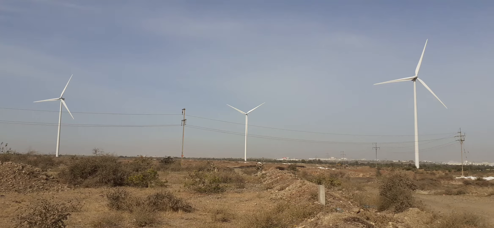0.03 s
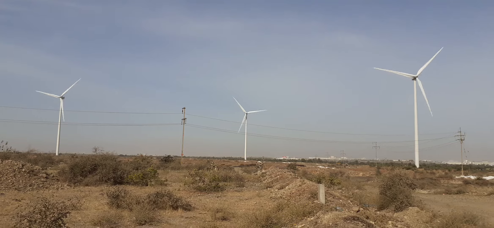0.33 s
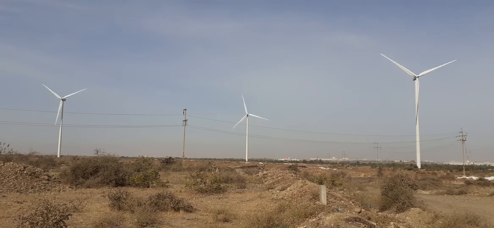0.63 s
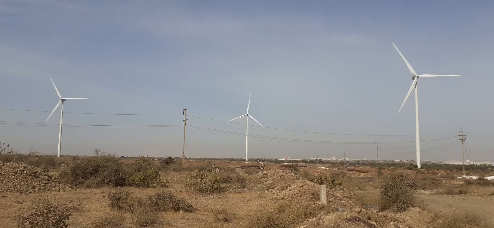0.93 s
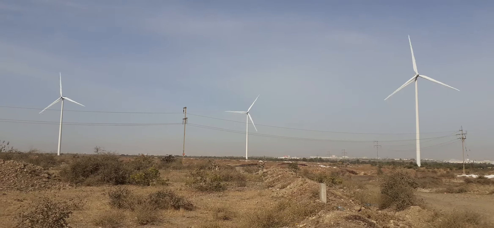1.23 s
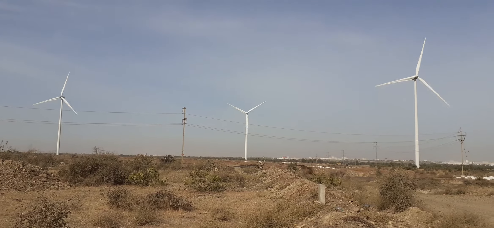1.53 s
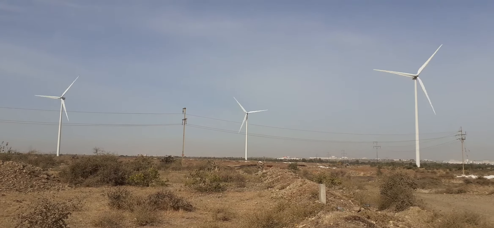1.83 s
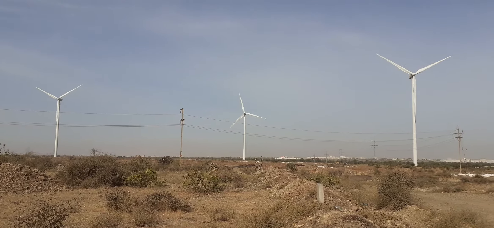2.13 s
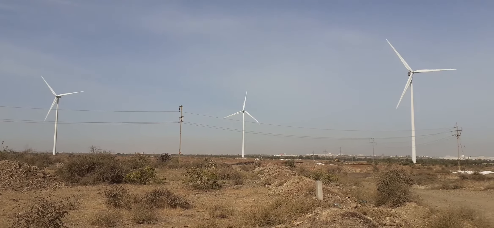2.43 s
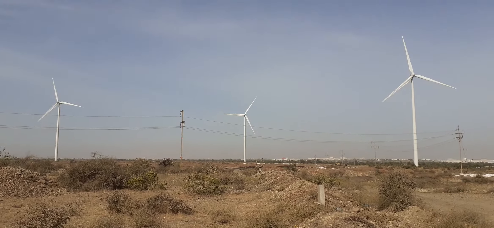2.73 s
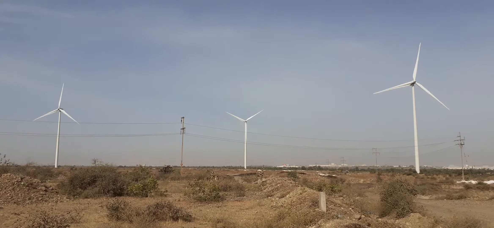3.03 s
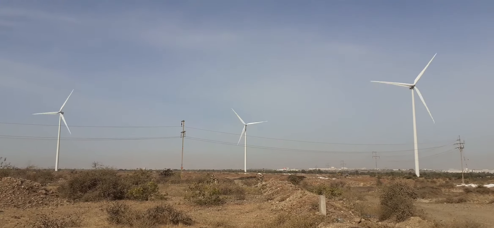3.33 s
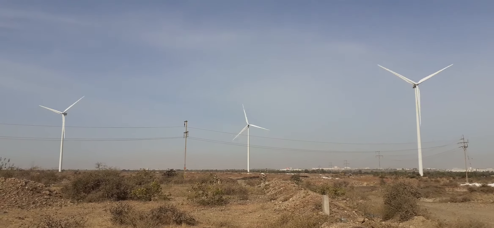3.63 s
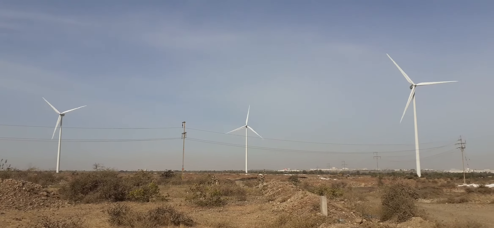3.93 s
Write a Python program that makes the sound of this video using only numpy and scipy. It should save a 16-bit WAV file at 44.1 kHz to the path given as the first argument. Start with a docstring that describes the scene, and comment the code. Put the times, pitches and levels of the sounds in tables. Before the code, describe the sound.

Wind turbines turn on an open plain, making a steady low rumble with a wavering hum and soft blade swishes. After a second or so, gusts start bumping the microphone on the left, and a faint whistle falls near the end.

```python
"""An open dry plain, where wind turbines turn. A distant rumble carries the wavering tones of their gears
and generators. Air flowing over the blades radiates a broad swish, tip hiss, brief whooshes and one thin
whistle that sinks in pitch as its blade turns away. Gusts buffet the left microphone port in short
low bumps, and turbulence flutters on both ports, faintly on the right one."""
import sys
import numpy as np
from scipy import signal
from scipy.fft import rfft, irfft
from scipy.io import wavfile

SR = 44100
rng = np.random.default_rng(int(sys.argv[2]) if len(sys.argv) > 2 else 0)


def wav_record(signal):
    """Record a signal, one row per channel, as 16-bit PCM in the file named by sys.argv[1]."""
    frames = np.transpose(np.atleast_2d(signal))
    bounded = np.clip(frames, -1, 1)
    # unit amplitude maps onto the largest positive 16-bit level
    quanta = np.round(bounded * 32767).astype(np.int16)
    wavfile.write(sys.argv[1], SR, quanta)


N = 176400
TIME = np.arange(N) / SR
PORT_EDGE_HZ = 43.8   # lower limit of the microphone ports


def rumble():
    """Air absorbs treble over distance, so far turbines and traffic merge into a low roar."""
    # (frequency [Hz], relative spectral density [dB])
    spectrum = [(25, -23), (40, -22.5), (55, 1.5), (120, 6), (160, 2), (320, 6), (420, -1), (560, -2),
                (800, -9.5), (930, -22.5), (1400, -24.5), (2200, -40.5), (4000, -58)]
    # (time [s], left level [dB], right level [dB])
    levels = [(0, -34, -36), (.9, -38, -39.5), (1.35, -36, -37.5), (2.2, -40, -40.5), (3.1, -38.5, -40),
              (3.7, -39, -41.5), (4, -35, -39)]
    bass_hz, fill_s = 150, 0.34
    roar = butter(banded_noise(spectrum, flicker_db=0.97), PORT_EDGE_HZ, "high", order=4)
    bass = butter(roar, bass_hz, "low", order=2)
    bass = butter(bass[:, ::-1], bass_hz, "low", order=2)[:, ::-1]   # backward pass: zero phase
    thinning = .5 * np.clip(2 - 2 * TIME / fill_s, 0, 1)   # the bass fills in at the start
    return from_db(in_time(levels)) * (roar - thinning * bass)


def gears():
    """Periodic forces in gearboxes and generators radiate tones; amplitude modulation makes them waver."""
    # (frequency [Hz], level [dB], line width [Hz], left minus right [dB])
    tones = [(194.3, -44, 5.9, 1), (221.4, -53, 5.8, -1), (485.3, -50.5, 2.7, 1), (777, -53.5, 24, 0.5),
             (818, -57.5, 20, -2), (969, -62, 3.9, 4.5), (1112, -62.5, 44, -9.5), (1960, -67, 55, 11.5),
             (4885, -83, 8, -14.5)]
    # swell of the main gear tone: (time [s], gain [dB])
    swell = [(0, 7.5), (.6, -8), (1.4, 11), (1.7, 1.5), (2.5, -0.5), (3.1, 4.5), (4, 4)]
    main_hz, swell_db = 486, in_time(swell)[0]
    out = 0
    for hz, db, width_hz, pan_db in tones:
        is_main = abs(np.log2(hz / main_hz)) < .5
        waver_db = -0.7 * np.array([drift(4.1), drift(8.5)])
        out += pan(pan_db) * from_db(db + is_main * swell_db + waver_db) * narrow_tone(hz, width_hz)
    return out


def blade_swish():
    """Turbulent flow over the blades radiates broadband noise that swells and fades."""
    # (time [s], relative level [dB])
    levels = [(.15, -54.5), (.72, -59.5), (1.38, -54.5), (1.8, -57.5), (2.4, -60), (3.15, -55.5),
              (3.3, -57), (3.78, -55.5), (3.98, -62)]
    # (frequency [Hz], relative spectral density [dB])
    spectrum = [(500, -7.5), (1000, 5.5), (1500, 3.5), (2100, -1.5), (2900, -3.5), (3600, -18.5),
                (4400, -16.5), (7500, -41)]
    return pan(-2) * from_db(in_time(levels) + 6.5) * banded_noise(spectrum, flicker_db=1.0)


def tip_hiss():
    """Flow noise rises in frequency with speed: the nearest blade tips hiss, on the right."""
    # (time [s], relative level [dB])
    levels = [(.13, -63), (.35, -64.5), (.72, -68), (1.15, -65), (1.45, -61), (1.85, -64), (2.45, -68.5),
              (2.8, -65), (3.0, -69), (3.15, -62.5), (3.27, -67), (3.6, -66.5), (3.97, -70.5)]
    # (frequency [Hz], relative spectral density [dB])
    spectrum = [(2000, -10.5), (3200, 2.5), (4100, -5.5), (5000, 0), (6300, -4), (7500, -17), (9000, 0)]
    return pan(-12) * from_db(in_time(levels) + 2) * banded_noise(spectrum, flicker_db=1.8)


def blade_whistle():
    """Doppler shift: a narrow-band whistle sinks in pitch as its blade turns away."""
    # (time [s], frequency [Hz], level [dB])
    glide = [(2.52, 6740, -90.5), (2.8, 6770, -73), (2.97, 6510, -78), (3.06, 6510, -63.5),
             (3.29, 6030, -74), (3.33, 5980, -63), (3.38, 5800, -72), (3.5, 5560, -70), (3.69, 5250, -70.5),
             (3.82, 5050, -88)]
    hz, db = in_time(glide)
    envelope = from_db(db + 1.8 * drift(14)) * (TIME > glide[0][0])
    return pan(-11) * envelope * narrow_tone(hz, width_hz=110)


def whooshes():
    """Air rushing past makes band-limited noise, in Gaussian swells that rise twice as fast as they fade."""
    # (peak time [s], fade [s], frequency [Hz], level [dB], left minus right [dB], half width [ratio])
    swells = [(1.135, 0.093, 2900, -56.5, -7, 0.15), (1.17, 0.064, 6300, -65, -13, 0.13),
              (1.307, 0.044, 6050, -62.5, -10, 0.052), (2.891, 0.14, 3330, -60, -2, 0.11),
              (3.122, 0.086, 3400, -54.5, -3.5, 0.18)]
    out = 0
    for peak_s, fade_s, hz, db, pan_db, half_width in swells:
        band_hz = [hz * (1 - half_width), hz * (1 + half_width)]
        air = rms_one(butter(rng.standard_normal((2, N)), band_hz, "band", order=2))
        span_s = fade_s * np.where(TIME < peak_s, .5, 1)
        envelope = np.exp(-np.pi / 2 * ((TIME - peak_s) / span_s) ** 2)
        out += pan(pan_db) * from_db(db) * envelope * air
    return out


def buffets():
    """Pseudo-sound: each eddy striking the left port is a pressure jolt in a short swell of turbulence."""
    # (time [s], duration [s], level [dB], brightness [Hz])
    eddies = [(1.356, 0.0066, -23.5, 332), (1.379, 0.01, -20, 330), (1.418, 0.017, -27.5, 218),
              (1.43, 0.0062, -24, 280), (1.457, 0.01, -19.5, 238), (1.691, 0.0056, -19, 800),
              (1.7, 0.005, -9, 860), (1.706, 0.0097, -13, 124), (1.957, 0.0073, -15.5, 270),
              (2.071, 0.0031, -17.5, 720), (2.103, 0.016, -20.5, 420), (2.138, 0.0086, -16, 330),
              (2.187, 0.0064, -20, 440), (2.203, 0.0041, -20.5, 700), (2.236, 0.0069, -20, 540),
              (2.248, 0.0033, -18, 680), (2.274, 0.0097, -25, 442), (2.312, 0.019, -21, 430),
              (2.322, 0.0074, -23, 650), (2.336, 0.0016, -14, 900), (2.43, 0.0086, -24, 600),
              (2.435, 0.015, -17.5, 130), (2.535, 0.008, -17, 260), (2.554, 0.0075, -21, 299),
              (2.614, 0.013, -22, 150), (2.751, 0.0063, -22, 247), (2.772, 0.011, -25.5, 298),
              (3.131, 0.008, -18, 382), (3.155, 0.015, -14, 302), (3.176, 0.0051, -14.5, 260),
              (3.196, 0.013, -18.5, 292), (3.211, 0.0039, -10.5, 270), (3.377, 0.021, -17, 467),
              (3.413, 0.0073, -10, 727), (3.437, 0.024, -21, 215), (3.550, 0.0047, -18, 300),
              (3.593, 0.018, -22, 238), (3.644, 0.024, -26, 660), (3.665, 0.013, -16, 220),
              (3.67, 0.0059, -12.5, 497), (3.709, 0.0064, -25, 260)]
    max_jolt_share, right_leak_db = 0.56, -47
    out = np.zeros(N)
    offsets = np.arange(-SR // 6, SR // 6)
    impulse = (offsets == 0) + 1e-18
    for time_s, length_s, db, bright_hz in eddies:
        swirl = eddy_pressure(rng.standard_normal(len(offsets)), bright_hz)
        swirl /= np.abs(signal.hilbert(swirl)) ** 0.56   # partly flatten its random envelope
        swirl *= np.exp(-np.pi / 2 * (offsets / SR / length_s) ** 2)
        jolt = eddy_pressure(impulse, bright_hz) * rng.choice([-1, 1])
        parts = butter([swirl, jolt], 2.14 * bright_hz, "low", order=4)
        swirl, jolt = butter(parts, 0.15 * bright_hz, "high", order=1)
        jolt_share = max_jolt_share / (1 + (length_s * bright_hz / 10) ** 2)   # long eddies mostly swirl
        burst = np.sqrt(1 - jolt_share) * rms_one(swirl) + np.sqrt(jolt_share) * rms_one(jolt)
        burst = port_cut(fill_notches(burst, jolt))
        burst *= from_db(db) * np.sqrt(length_s * SR / np.sum(burst ** 2))
        centre = int((time_s - .5 / bright_hz) * SR)   # early, to offset the filter delay
        out[np.clip(offsets + centre, 0, N - 1)] += burst
    return out * from_db([[0], [right_leak_db]])


def flutter():
    """Turbulent pressure is local, so each port has its own lumpy low noise."""
    # left port: (time [s], level [dB])
    left_levels = [(0, -59), (.6, -40.5), (1.25, -54), (1.4, -35), (1.55, -41), (1.95, -38), (2.12, -28.5),
                   (2.9, -36), (3.28, -30.5), (3.42, -34.5), (3.72, -29), (3.76, -69), (4, -42)]
    # right port: (time [s], level [dB])
    right_levels = [(1.1, -62), (1.16, -34), (1.27, -38.5), (1.35, -67.5), (2.56, -45.5), (2.98, -45),
                    (3.08, -25.5), (3.17, -49), (3.5, -45.5), (3.65, -31), (3.76, -60)]
    ports = []
    for levels, bright_hz, lumpy_db in [(left_levels, 280, 1.5), (right_levels, 108.3, 4.5)]:
        air = eddy_pressure(rng.standard_normal(N), bright_hz) * from_db(lumpy_db * drift(14))
        ports.append(from_db(in_time(levels)[0]) * rms_one(port_cut(air)))
    return np.array(ports)


def eddy_pressure(excitation, bright_hz):
    """Large eddies hold most energy: the spectrum tilts to the bass and falls steeply above bright_hz."""
    tilted = butter(excitation, 165, "low", order=1)
    return butter(tilted, 1.02 * bright_hz, "low", order=3)


def fill_notches(burst, jolt):
    """Spectral shaping pulls a burst's colour towards a clean jolt's, filling its hollow notches."""
    spectrum = rfft(burst)
    gain = (np.abs(rfft(jolt)) / (np.abs(spectrum) + 1e-9)) ** .55
    return irfft(spectrum * gain, len(burst))


def port_cut(x):
    """A port acts as a high-pass; zero-phase filtering keeps a bump compact."""
    forward = butter(x, PORT_EDGE_HZ, "high", order=4)
    return butter(forward[::-1], PORT_EDGE_HZ, "high", order=4)[::-1]


def banded_noise(spectrum, flicker_db):
    """Partly coherent stereo noise: each flickering third-octave band mixes mid and side; rms 1."""
    # (frequency [Hz], left-right correlation [-1 to 1])
    correlation = [(50, 1), (120, 1), (240, 0.83), (470, 0.57), (920, -0.026), (1800, -0.034),
                   (7000, -0.23)]
    out, edges = 0, 22 * 2 ** (np.arange(27) / 3)
    white = rng.standard_normal((2, 2, N))
    for k, (low, high) in enumerate(zip(edges, edges[1:])):
        if high < spectrum[0][0] or low > spectrum[-1][0]:
            continue
        mid, side = butter(white[k % 2], [low, high], "band", order=2)
        hz = np.sqrt(low * high)
        alike = at_hz(correlation, hz)
        gain = from_db(at_hz(spectrum, hz) + flicker_db * drift(18))
        out += gain * (np.sqrt(1 + alike) * mid + np.sqrt(1 - alike) * side * [[1], [-1]])
    return rms_one(out)


def narrow_tone(hz, width_hz):
    """Line broadening: moving air modulates a tone's amplitude and phase at random; rms 1."""
    blur = drift(width_hz) + 1j * drift(width_hz)
    blur = rms_one(blur / np.sqrt(np.abs(blur) + 1e-9))
    carrier = np.exp(2j * np.pi * np.cumsum(hz + np.zeros(N)) / SR)
    return np.sqrt(2) * (blur * carrier).real


def drift(rate_hz):
    """Low-passed noise gives a slow random wander of rms 1."""
    step, run_in = 40, 2000
    pole = np.exp(-2 * np.pi * rate_hz * step / SR)
    white = rng.standard_normal(N // step + run_in + 2)
    slow = signal.lfilter([1], [1, -2 * pole, pole * pole], white)[run_in:]
    return np.interp(np.arange(N) / step, np.arange(len(slow)), rms_one(slow))


def from_db(db):
    """Decibels to amplitude ratio."""
    return 10 ** (np.asarray(db) / 20)


def rms_one(x):
    """Normalise to rms 1."""
    return x / np.sqrt(np.mean(np.abs(x) ** 2) + 1e-20)


def in_time(rows):
    """Interpolate each column of a time curve at every sample."""
    times, *columns = np.transpose(rows)
    return np.array([np.interp(TIME, times, column) for column in columns])


def at_hz(points, hz):
    """Interpolate on a log-frequency axis."""
    frequencies, values = np.transpose(points)
    return np.interp(np.log(hz), np.log(frequencies), values)


def pan(db):
    """Stereo gains for a level difference, left minus right."""
    return rms_one(from_db([[db / 2], [-db / 2]]))


def butter(x, hz, kind, order):
    """Butterworth filter."""
    sections = signal.butter(order, np.clip(hz, 10, SR * .45), kind, fs=SR, output="sos")
    return signal.sosfilt(sections, x)


def scene():
    """Superposition of far sound, blades and port wind; in the final lull the far bass drops on the left."""
    lull_s, lull_cut_hz, right_lag_s = 3.755, 420, 0.00015
    left, right = rumble() + gears()
    lull = np.clip((TIME - lull_s) / .02 + .5, 0, 1)
    left = (1 - lull) * left + lull * butter(left, lull_cut_hz, "high", order=2)
    far = np.array([left, np.interp(TIME - right_lag_s, TIME, right)])
    return far + flutter() + blade_swish() + tip_hiss() + blade_whistle() + whooshes() + buffets()


def record(dry):
    """A band-limited microphone; separately, a faint hiss lies above 10 kHz. The sound cuts in at start_s."""
    microphone_hz, output_hz, floor_db, start_s = 7900, 15700, -77.5, .102
    heard = signal.sosfilt(signal.ellip(10, .2, 70, microphone_hz, fs=SR, output="sos"), dry)
    floor = butter(from_db(floor_db) * rng.standard_normal((2, N)), 10100, "high", order=2)
    heard = (heard + floor) * np.clip((TIME - start_s) / .002, 0, 1)
    return signal.sosfilt(signal.ellip(10, .2, 70, output_hz, fs=SR, output="sos"), heard)


dry = scene()
out = record(dry)
wav_record(out)
```